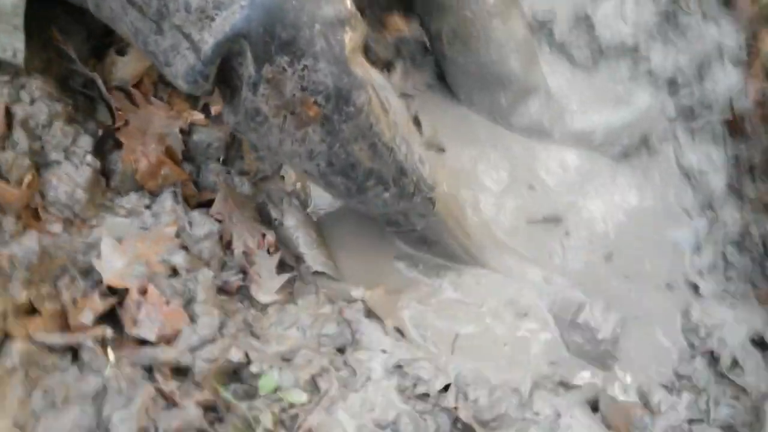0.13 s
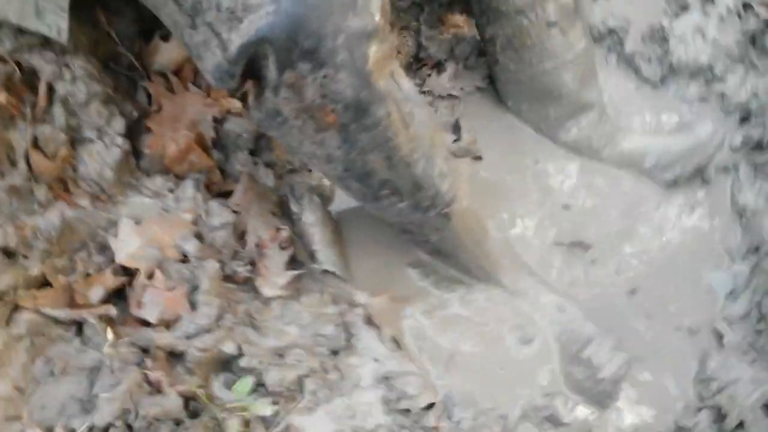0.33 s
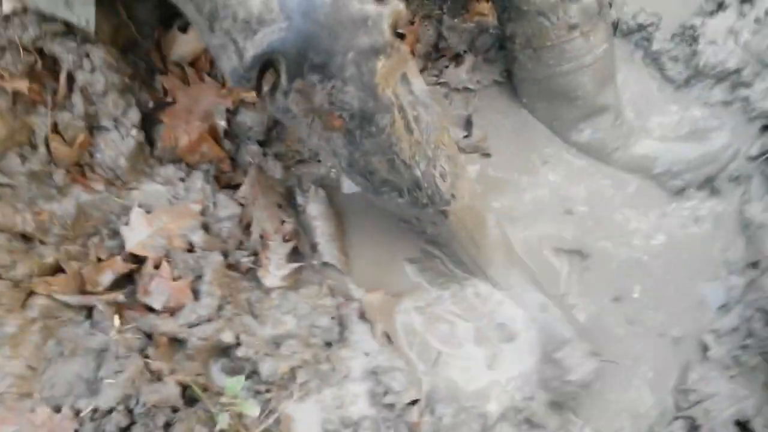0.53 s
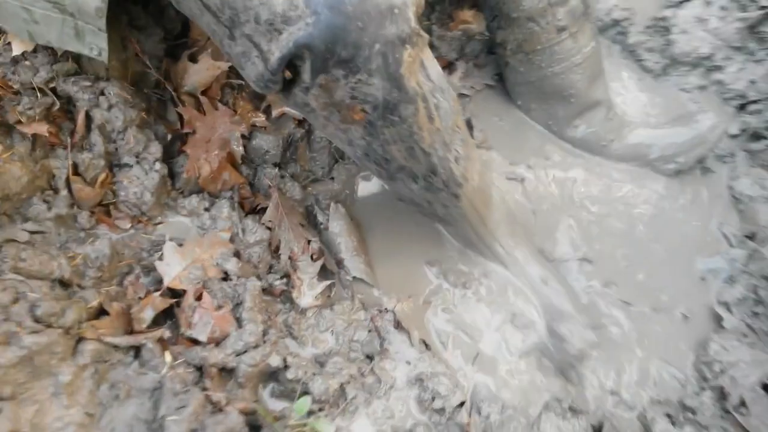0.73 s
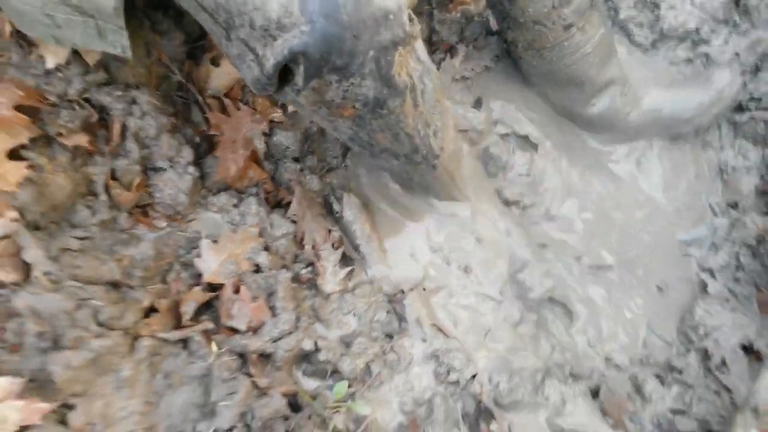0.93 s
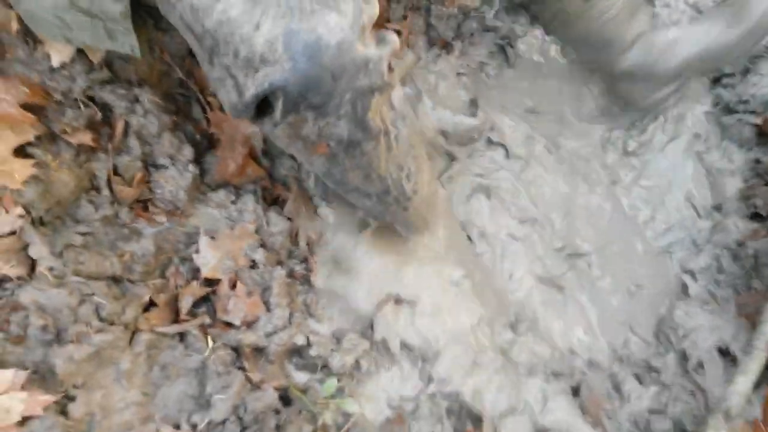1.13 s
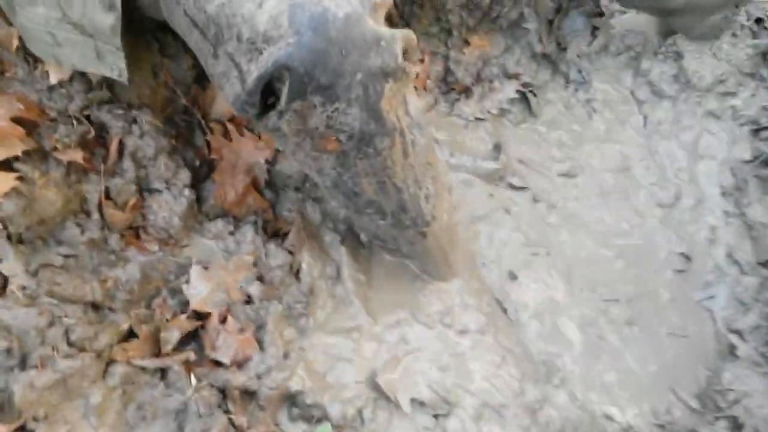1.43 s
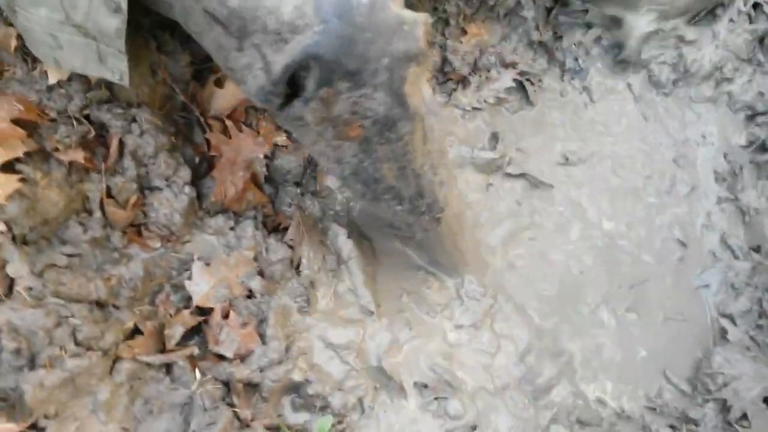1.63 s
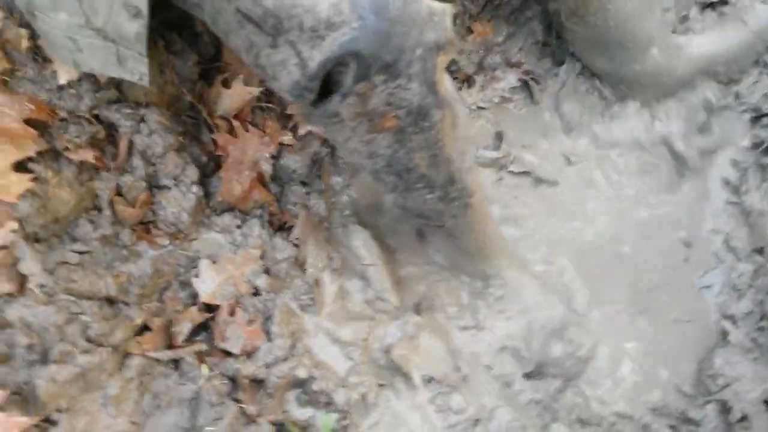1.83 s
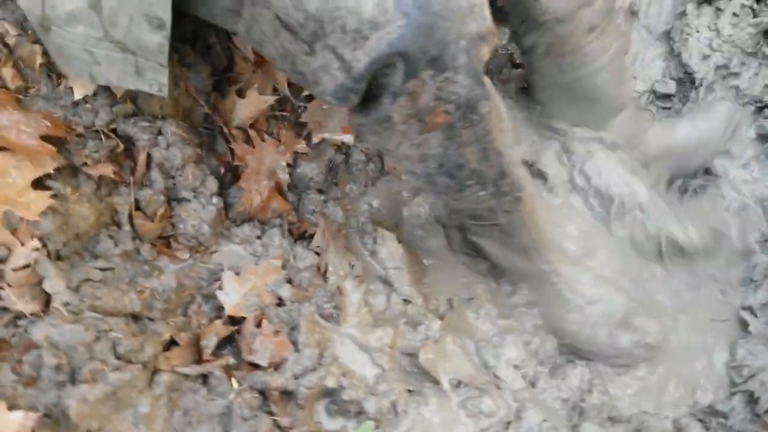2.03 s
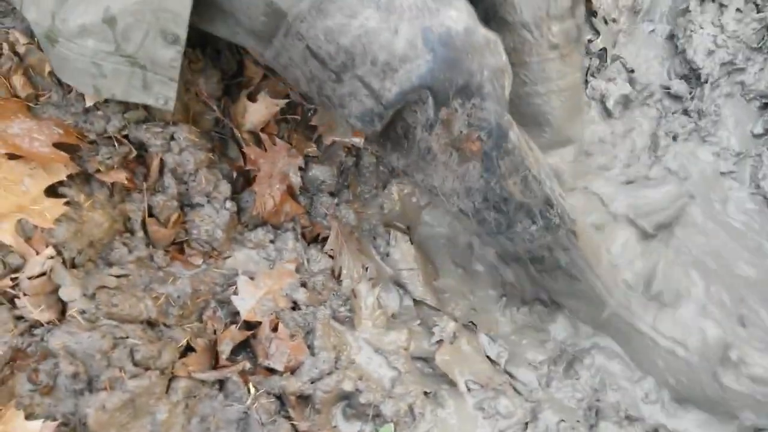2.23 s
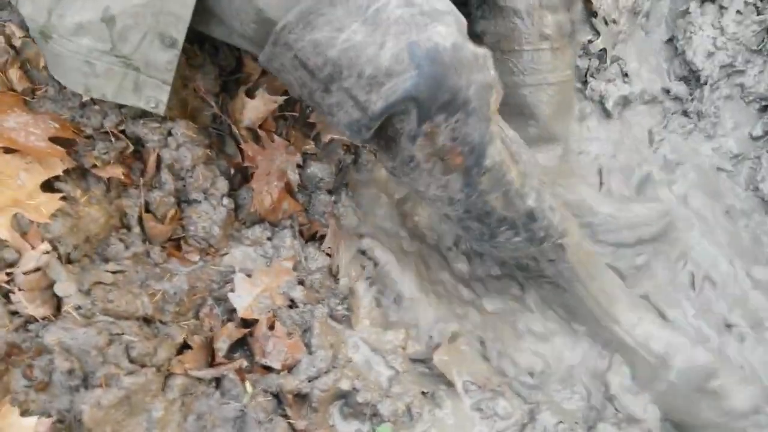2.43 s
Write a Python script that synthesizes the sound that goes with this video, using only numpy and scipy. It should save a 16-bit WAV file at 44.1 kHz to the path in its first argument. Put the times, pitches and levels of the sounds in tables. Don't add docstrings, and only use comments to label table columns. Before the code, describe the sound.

Watery mud stirred by boots, heard close on a hand-held camera outdoors. Loud handling bumps and scrapes come first, then a lull, then glugs, rising squelches, droplets and wet slaps; left side holds only faint hum and noise.

```python
import sys
import numpy as np
from scipy import signal
from scipy.fft import rfft, irfft
from scipy.io import wavfile
from scipy.ndimage import uniform_filter1d

SR = 44100
rng = np.random.default_rng(int(sys.argv[2]) if len(sys.argv) > 2 else 0)


def file_out(sig):
    cols = np.atleast_2d(sig).T
    lim = np.clip(cols, -1, 1)
    pcm = np.round(lim * 32767).astype(np.int16)
    wavfile.write(sys.argv[1], SR, pcm)


def ratio(d):
    e = np.asarray(d, float) / 20
    return 10 ** e


N = 114660


def evened(x):
    return x / np.sqrt(np.mean(x ** 2) + 1e-20)


def curve(table, col=1):
    rows = np.array(table)
    return np.interp(np.arange(N) / SR, rows[:, 0], rows[:, col])


def coloured(x, points):
    f, db = np.transpose(points)
    hz = np.fft.rfftfreq(N, 1 / SR)
    gain = ratio(np.interp(np.log(hz + 1), np.log(f), db))
    return evened(irfft(rfft(x) * gain, N))


def smoothed_chance(shape, hz):
    size = max(int(SR / hz), 2)
    once = uniform_filter1d(rng.standard_normal(shape), size)
    return evened(uniform_filter1d(once, size))


def lumps(hz):
    return smoothed_chance(N, hz)


def add(mix, s, sound):
    part = mix[round(s * SR):][:len(sound)]
    part += sound[:len(part)]


# (frequency [Hz], density [dB per Hz])
CIRCUIT_SPECTRUM = [(20, -31), (100, -2.5), (400, -13.5), (1200, -24), (3000, -27), (8000, -30),
                    (15000, -35.5)]
# (time [s], gain [dB])
CIRCUIT_SWELLS = [
    (.32, 4.5),
    (.72, 6),
    (1.329, 3),
    (1.5, 5),
    (2.39, 5.5),
    (.42, -5.5),
]
# (frequency [Hz], level [dB rms])
HUM_TONES = [
    (60, -56),
    (90.3, -64.5),
    (120.2, -78),
    (480.7, -66.5),
    (5024.7, -84),
]


def circuit(waver_db=3.0, swell_s=0.039):
    t = np.arange(N) / SR
    swell_db = sum(db * np.exp(-((t - s) / swell_s) ** 2) for s, db in CIRCUIT_SWELLS)
    hum = np.zeros(N)
    for hz, db in HUM_TONES:
        level = ratio(db - 7.5 + waver_db * lumps(hz=5.4))
        hum += level * np.sin(2 * np.pi * (hz * t + rng.random()))
    noise = coloured(rng.standard_normal(N), CIRCUIT_SPECTRUM) * ratio(-59.5)
    return (noise + hum) * ratio(swell_db)


# (frequency [Hz], density [dB per Hz])
AIR_SPECTRUM = [(20, -8.5), (60, 0), (500, -4.5), (1000, -2.5), (1600, -22.5), (4000, -17.5),
                (15000, -26.5)]


def air(level_db=-48.5):
    return coloured(rng.standard_normal(N), AIR_SPECTRUM) * ratio(level_db + .6 * lumps(hz=8))


# (time [s], spray
# level [dB], slosh level over spray [dB])
STIRRING = [(0.0, -64.5, -3), (.12, -50.5, -15), (.27, -43, -12), (.4, -48.5, -19), (.42, -54, -2),
            (.88, -69.5, 5), (1.14, -57, -2), (1.27, -50, -0.5), (1.46, -57, -5), (1.54, -43, 2),
            (1.63, -51, 2), (1.75, -43.5, -4.5), (1.9, -51.5, 3.5), (2.13, -54, 11), (2.3, -42, 1),
            (2.36, -46.5, 2), (2.45, -41, -6.5), (2.6, -49, 2.5)]
# (frequency [Hz], density [dB per Hz])
SPRAY_SPECTRUM = [(400, 0), (1500, -6.5), (3000, 5), (4600, -5.5), (6500, 2), (10000, -8), (15000, -6)]


def spray(level_db=5.5, flicker_db=3.0, calm_db=-13):
    hiss = coloured(rng.standard_normal(N), SPRAY_SPECTRUM)
    choppy = np.clip(1.5 - curve(STIRRING, col=2) / calm_db, .15, 1)
    return hiss * ratio(curve(STIRRING) + level_db + flicker_db * choppy * lumps(hz=147))


def bubble(hz, cycles, rise, onset=0.24, ragged=0.37):
    u = np.arange(0, 1.2, hz / max(cycles, 2) / SR / 2)[:4000]
    pitch_wobble, loud_wobble = smoothed_chance((2, 4000), hz / 2)[:, :len(u)]
    shape = (1 - np.exp(-u * cycles / onset * 2)) * np.exp(-4.5 * u)
    pitch = hz * (1 + rise * u * (.4 + u)) * (1 + 0.13 * ragged * pitch_wobble)
    turns = np.cumsum(pitch) / SR
    return shape / shape.max() * (1 + ragged * loud_wobble) * np.sin(2 * np.pi * turns)


def swarm(per_s, low_hz, high_hz, cycles, spread_db, cap=3, clump_db=3.0):
    out, kinds = np.zeros(N), 24
    size = ratio(spread_db * np.minimum(rng.exponential(1, N), cap))
    size = size * (rng.random(N) < per_s / SR)
    kind = rng.integers(0, kinds, N)
    for k, hz in enumerate(np.geomspace(low_hz, high_hz, kinds)):
        grain = bubble(hz, cycles * rng.uniform(0.44, 1.75), rng.uniform(0, 0.45), onset=1.0)
        out += signal.oaconvolve(size * (kind == k), grain)[:N]
    return evened(out * ratio(clump_db * lumps(hz=37.0)))


# (time [s], level [dB], decay [s], brightness [dB])
WATER_SLAPS = [
    (1.16, -28, 0.023, -11),
    (1.257, -46, 0.051, 8),
    (1.502, -52, 0.016, 5),
    (1.667, -43.5, 0.064, 9),
    (1.755, -47.5, 0.032, 14),
    (2.266, -31.5, 0.0045, -3),
    (2.306, -21, 0.074, -7.5),
    (2.466, -42.5, 0.15, 4.5),
]


def slosh(gurgle_db=2.0, crackle_db=3.5, fizz_db=-3.5, sheet_db=-3):
    stir = ratio(curve(STIRRING) + curve(STIRRING, col=2))
    low, high, t = np.zeros(N), np.zeros(N), np.arange(5000) / SR
    for s, db, decay_s, bright_db in WATER_SLAPS:
        burst = ratio(db - 30 * t / decay_s) * np.minimum(t / 0.00021, 1)
        add(low, s, burst)
        add(high, s, burst * ratio(bright_db))
    gurgle = ratio(gurgle_db) * swarm(700, 520, 1500, cycles=6, spread_db=3.8, cap=2.5)
    crackle = ratio(crackle_db) * swarm(900, 1300, 4600, cycles=9, spread_db=4.6, cap=2.6)
    fizz = ratio(fizz_db) * swarm(4000, 4400, 14500, cycles=12, spread_db=3.8)
    sheet = ratio(sheet_db) * coloured(rng.standard_normal(N), SPRAY_SPECTRUM) * high
    return (stir + low) * gurgle + (stir + high) * (crackle + fizz) + sheet


def mud(level_db=-4):
    heave = swarm(250, 150, 450, cycles=3, spread_db=2.5)
    return ratio(curve(STIRRING) + curve(STIRRING, col=2) + level_db) * heave


def resonate(x, hz, width):
    r = np.exp(-np.pi * width / SR)
    return 2 * signal.lfilter([1 - r], [1, -r * np.exp(2j * np.pi * hz / SR)], x).real


# (frequency [Hz], width [Hz], level [dB])
CASE_MODES = [(154, 87, -9), (231.5, 57.5, -10), (353.5, 51, 4), (465, 51.6, -2.5), (600, 80, -13),
              (792, 94, -12), (1075, 158, -5), (1310, 225, -6), (1650, 160, -19.5), (2100, 130, -28.5),
              (3020, 260, -19)]
# (time [s], level [dB], scrape brightness [dB])
HAND_RUB = [(0.0, -102, -21), (.13, -61, 14), (.2, -43.5, 6), (.24, -38.5, -5.5), (.27, -39, -3),
            (.32, -29, -1), (.38, -33, 2.5), (.46, -35, 1.5), (.588, -29.5, -2.5), (.594, -39.5, 2.5),
            (.665, -42.5, -2.5), (.8, -53, -1), (.88, -71, -9), (1.0, -79, -3), (1.03, -45.5, -17),
            (1.08, -67, 3), (1.35, -44.5, -7.5), (1.44, -50.5, 3), (1.47, -82, -5)]


def rub(lumpy_db=2.17, level_db=3.5):
    slips = rng.standard_normal(N)
    slips *= 1 + 3.5 * (rng.random(N) < 400 / SR)
    slips *= ratio(lumpy_db * lumps(hz=42.6))
    bright = ratio(curve(HAND_RUB, col=2))
    body = np.zeros(N)
    for k, (hz, width, db) in enumerate(CASE_MODES):
        mode = evened(resonate(resonate(slips, hz, 3 * width), hz, width))
        body += ratio(db) * mode * (bright if k > 3 else 1)
    return ratio(curve(HAND_RUB) + level_db) * body


# (time [s], peak [dB], brightness [dB per octave], push [ms])
CASE_KNOCKS = [(.138, -15, -10.5, 7.2), (.151, -16, -6.5, 5), (.1575, -5.5, 4.5, 0.92), (.415, 0, 0, 4.7),
               (.447, -17, 4, 5), (0.483, -10.5, 2, 2.4), (.522, -19, -5.5, 4), (.537, -22, 5.5, 4),
               (.564, -12.5, -4, 2.2), (.58, -14.5, -5, 5), (.233, -23, -5, 3.1), (.282, -22, 1.5, 5.2),
               (.33, -21, 0, 2.8), (0.381, -18, -1, 4.7), (.621, -22.5, -1, 4), (.661, -22.5, 1, 4),
               (0.763, -32.5, -3, 4), (2.588, -31, -14, 5.1)]


def knocks(damp=1.64):
    out, t = np.zeros(N), np.arange(2600) / SR
    for s, db, bright_db, push_ms in CASE_KNOCKS:
        ding = np.zeros(len(t))
        for hz, width, mode_db in CASE_MODES:
            level = ratio(mode_db + 6 + bright_db * np.log2(hz / 350))
            decay = np.exp(-np.pi * width * damp * t / 2)
            ding += level * decay * np.sin(2 * np.pi * hz * t + rng.uniform(0, 1.0))
        ding *= 1 - np.exp(-1000 * t / push_ms)
        add(out, s, ratio(db) * ding / abs(ding).max())
    return out


# (time [s], peak [dB], low edge [Hz], high edge [Hz])
FILM_SNAPS = [(.1575, -21.5, 1500, 5340), (.4155, -31, 704, 1400), (1.0483, -34.5, 6000, 14000),
              (1.1026, -37, 9000, 15000), (1.127, -33, 8000, 15500), (1.1575, -30, 2500, 9000),
              (1.162, -25.5, 496, 2980), (1.179, -33, 500, 4000), (1.251, -32, 4000, 14000),
              (1.2632, -32, 4000, 14300), (1.2827, -23.5, 9000, 16000), (1.4995, -40, 4500, 8900),
              (1.5361, -34, 4000, 9000), (1.6676, -32, 4000, 12000), (1.754, -27, 4000, 14000),
              (1.8674, -28, 4000, 8900), (1.913, -38, 1500, 5000), (1.93, -36, 4000, 9000),
              (2.2661, -16.5, 400, 4960), (2.288, -17, 2000, 4500), (2.305, -12.5, 3000, 14000),
              (2.3342, -13, 500, 6040), (2.396, -26, 2500, 9000), (2.4043, -17.5, 2000, 15000),
              (2.429, -21, 10000, 15800), (2.4385, -20, 8000, 15500), (2.467, -23, 5000, 10000)]


def snaps(decay_s=0.00083, tail_s=0.012, tail_db=-16):
    out, t = np.zeros(N), np.arange(900) / SR
    crack = np.exp(-t / decay_s) * np.minimum(t / decay_s, 1)
    shape = crack + ratio(tail_db) * np.exp(-t / tail_s)
    for s, db, low_hz, high_hz in FILM_SNAPS:
        band = signal.butter(2, [low_hz, high_hz], "band", fs=SR, output="sos")
        snap = signal.sosfilt(band, rng.standard_normal(900) * shape)
        add(out, s, ratio(db) * snap / abs(snap).max())
    return out


# (time [s], peak [dB], pitch [Hz])
DROPLETS = [(0.9443, -40.5, 3330), (1.044, -35, 3110), (1.1623, -28.5, 2100), (1.2127, -24, 2990),
            (1.2192, -24.5, 4100), (1.263, -27.5, 2210), (1.502, -30.5, 2580), (1.516, -24.5, 3760),
            (1.538, -24, 3820), (1.6657, -25.5, 3510), (1.731, -19.5, 3870), (1.7552, -24.5, 4050),
            (1.8297, -32, 2420), (1.869, -28.5, 3110), (1.9126, -28, 3260), (1.9792, -27.5, 2510),
            (2.0885, -34, 2310), (2.112, -25, 3000), (2.155, -24.5, 3340), (2.18, -24, 3220),
            (2.211, -23, 2700), (2.2373, -26, 4430), (2.162, -22, 3500), (2.314, -22, 2770),
            (2.518, -21, 3580), (2.2644, -17.5, 3110), (2.2753, -25, 2430), (2.308, -22, 2680),
            (2.4381, -12.5, 3880), (2.465, -30, 2420), (2.467, -26, 3620), (2.474, -19.5, 2420),
            (2.5034, -17.5, 2380)]


def droplets(level_db=-2.0):
    out = np.zeros(N)
    for s, db, hz in DROPLETS:
        add(out, s, ratio(db + level_db) * bubble(hz, 20.5, 0.099, onset=0.83))
    return out


# (time [s], peak [dB], pitch [Hz])
TICKS = [
    (1.1, -26, 6920),
    (1.6, -33, 6600),
    (1.4, -21, 6450),
    (3.7, -24, 4000),
]


def ticks():
    out = np.zeros(N)
    for s, db, hz in TICKS:
        add(out, s, ratio(db) * bubble(hz, 25.7, 0.17, ragged=0.86))
    return out


# (time [s], peak [dB], pitch [Hz], length [cycles])
LARGE_BUBBLES = [(1.104, -39, 785, 5.6), (1.161, -31, 541, 14.5), (1.202, -33, 1330, 16),
                 (1.222, -25, 1390, 15), (1.251, -39.5, 944, 16), (1.478, -37, 1000, 7.8),
                 (1.557, -32, 660, 10), (1.616, -27, 1045, 9), (1.631, -18, 738, 12), (1.669, -27, 796, 16),
                 (1.704, -29.5, 890, 7.6), (1.755, -25.5, 1096, 27), (1.932, -29.5, 1016, 10.4),
                 (1.961, -30.5, 923, 9), (1.775, -30, 875, 23), (1.857, -39, 1280, 12),
                 (1.87, -35.5, 930, 12), (2.016, -32, 483.5, 21.7), (2.031, -27.5, 1440, 9.6),
                 (2.106, -27.5, 1300, 14), (2.114, -31, 1050, 12), (2.128, -32.5, 630, 14.5),
                 (2.167, -33, 1193, 16), (2.195, -33.5, 600, 8), (2.215, -27, 1100, 11),
                 (2.233, -35, 950, 20), (2.41, -29, 1090, 8.6), (2.478, -35.5, 504, 8),
                 (2.493, -39, 1510, 8), (2.576, -34.5, 545, 5.7), (2.265, -28, 408, 3),
                 (2.289, -23.5, 712, 6), (2.305, -16, 600, 19), (2.39, -23, 1225, 7.2)]


def glugs(level_db=3.5):
    out = np.zeros(N)
    for s, db, hz, cycles in LARGE_BUBBLES:
        add(out, s, ratio(db + level_db) * bubble(hz, cycles, rise=0.22))
    return out


# (time [s], peak [dB], pitch [Hz], length [cycles], pitch rise [share])
LONG_SQUELCHES = [
    (1.397, -30, 836, 25, 2),
    (1.673, -35, 980, 18, 2.4),
    (1.722, -27.5, 950, 22, 1.1),
    (2.546, -26.5, 1000, 19, .7),
    (2.312, -26, 290, 7.7, .05),
    (2.128, -25.5, 900, 20, 0.95),
    (2.318, -21, 950, 37.6, 0.255),
]


def squelches():
    out = np.zeros(N)
    for s, db, hz, cycles, rise in LONG_SQUELCHES:
        add(out, s, ratio(db) * bubble(hz, cycles, rise, onset=1.5))
    return out


def scene():
    left = circuit()
    right = rub() + slosh() + spray() + air() + knocks() + snaps()
    right += glugs() + squelches() + droplets() + ticks() + mud()
    return np.array([left, right])


def band_limit(x):
    return signal.sosfilt(signal.butter(12, 15900, fs=SR, output="sos"), x)


def record(dry):
    low_pass = signal.firwin(511, 14640, window=("kaiser", 9), fs=SR)
    mix = signal.oaconvolve(dry, low_pass[None], "same")
    return band_limit(mix)


dry = scene()
out = record(dry)
file_out(out)
```